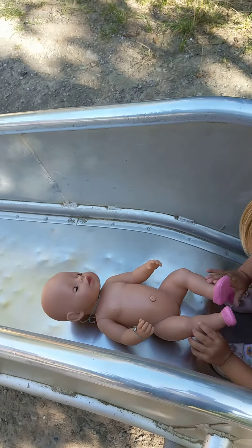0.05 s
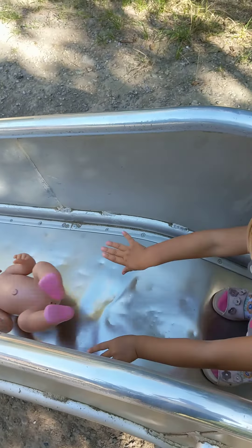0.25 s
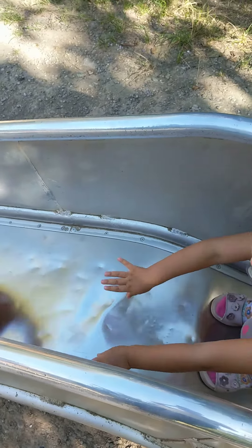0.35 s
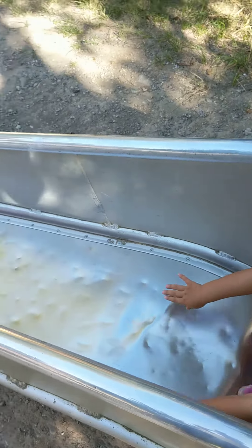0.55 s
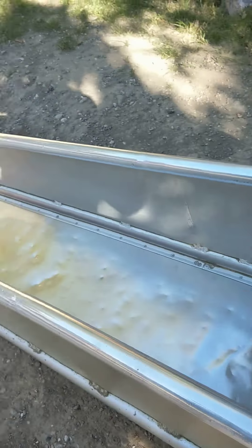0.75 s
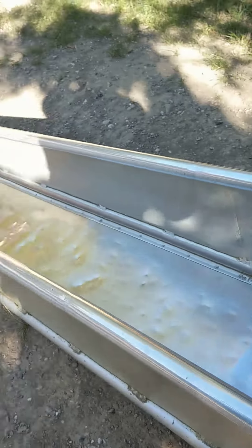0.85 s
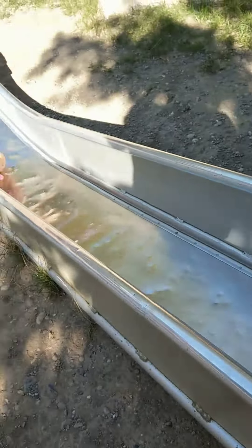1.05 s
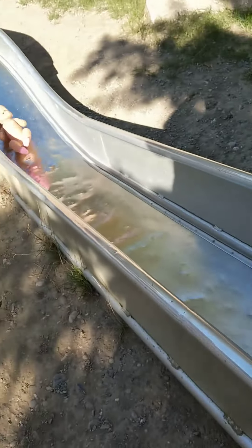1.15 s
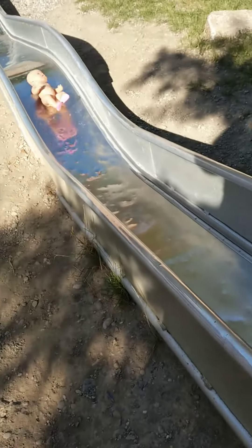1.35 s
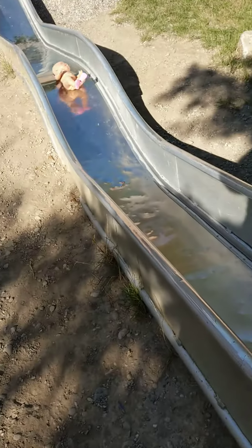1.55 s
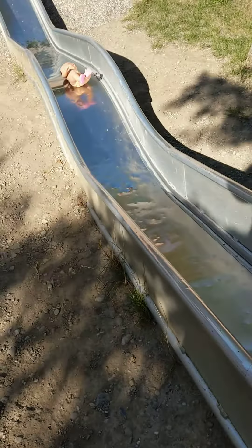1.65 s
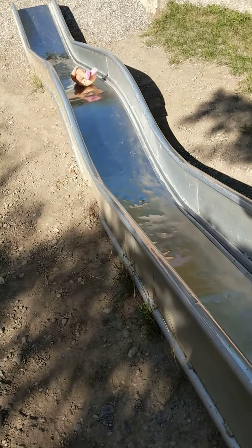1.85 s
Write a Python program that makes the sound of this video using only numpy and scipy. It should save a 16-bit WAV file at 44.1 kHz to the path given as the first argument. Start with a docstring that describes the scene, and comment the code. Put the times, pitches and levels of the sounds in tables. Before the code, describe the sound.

Plastic doll sliding down a steel slide outdoors, with hollow bumps, scraping and rattling.

```python
"""A hollow plastic doll goes down a steel playground slide: it scrapes and judders, knocks twice hard,
then rattles away. Each contact ticks, makes the doll's shell clack and sets the steel sheet booming;
between contacts the doll rubs along. Here and there the plastic sticks to the metal and squeaks,
and at full speed the loose limbs chatter. Open air with a little low wind lies behind."""
import sys
import numpy as np
from scipy.fft import rfft, irfft, next_fast_len
from scipy.io import wavfile
from scipy.ndimage import map_coordinates

SR = 44100
rng = np.random.default_rng(int(sys.argv[2]) if len(sys.argv) > 2 else 0)


def generate_wav(signal):
    """Clip the signal to [-1, 1] and save it as 16-bit WAV at the path in sys.argv[1]."""
    frames = np.transpose(np.atleast_2d(signal))
    scaled = np.clip(frames, -1, 1) * 32767
    pcm = np.round(scaled).astype(np.int16)
    wavfile.write(sys.argv[1], SR, pcm)


N = 83790

# Levels are relative: the dB settings below shift them. A ring time (T60) is the time to fade 60 dB.
# The doll hits the slide. Each row: start in seconds, tick level in dB, boom level in dB,
# boom pitch in Hz, then the clang, clack and snap levels in dB.
CONTACTS = [(0.009, -76, -40.5, 215, -46.5, -53, -63), (0.146, -45, -34.5, 210, -47.5, -43, -40),
            (0.1698, -50, -43, 225, -49.5, -38, -44), (0.207, -47, -46, 270, -60, -37, -59),
            (0.214, -60, -40, 252, -58, -33, -59.0), (0.228, -39.5, -34, 236, -38.5, -19, -49),
            (0.2432, -53, -33, 220, -38, -35, -44), (0.2632, -62, -22.5, 249, -36, -29, -34.5),
            (0.285, -37, -20.5, 266.0, -31.5, -28, -34.5), (0.3255, -27.5, -16, 246, -19.5, -27.5, -32),
            (0.339, -41, -27, 252.0, -41, -35, -34), (0.384, -72.0, -21, 226, -47, -64, -59),
            (0.3962, -49, -37, 217, -37.5, -44, -48), (0.4786, -29, -7.5, 272, -25, -15, -26),
            (0.4993, -39, -18, 283, -35.5, -33, -33.5), (0.511, -62, -12, 245, -26, -32.5, -52),
            (0.5354, -45, -18, 220, -34.5, -38, -42), (0.576, -47.5, -31, 250, -37, -43, -45.5),
            (0.6095, -48.5, -39, 232, -53, -41, -47), (0.6314, -58, -49, 242, -26.5, -31.5, -47),
            (0.647, -45.5, -16, 230, -34, -35.5, -45), (0.686, -48.5, -20, 229.7, -31, -43.5, -48),
            (0.7215, -41.5, -39, 234, -37, -38, -48), (0.745, -46, -21, 214, -74, -53, -53),
            (0.7678, -46, -50, 214.0, -52, -48.0, -43.5), (0.826, -39, -20.5, 237, -31.5, -30.5, -39.5),
            (0.836, -70, -16, 225, -46, -62, -70), (0.87, -47, -28, 247.0, -36.5, -39, -42.5),
            (0.8826, -50, -22, 247.0, -31.5, -35.5, -45), (0.894, -43, -27.5, 236, -31.5, -38, -53),
            (0.921, -38, -22, 221.6, -39.5, -38, -37), (0.949, -53, -24, 225, -48, -44.5, -44),
            (0.957, -51, -43, 198.0, -43, -40, -52), (0.9756, -44, -41, 196.0, -48, -48.5, -59),
            (1.023, -47, -35, 250, -45, -46, -45), (1.0369, -44.5, -30, 238, -31, -33.5, -45.0),
            (1.042, -56, -22, 238, -32, -45, -52), (1.0702, -48, -21, 259.0, -58, -50, -60),
            (1.0965, -43.5, -23, 280, -35.5, -32.5, -41.5), (1.1166, -43.5, -17.5, 277, -31.5, -42, -44),
            (1.129, -48.0, -27, 248, -31, -31.5, -40.5), (1.155, -47, -20.5, 205, -35, -50, -51),
            (1.1627, -66.0, -17.5, 220, -27, -34, -46), (1.185, -49, -23, 227.0, -31, -36, -49),
            (1.208, -42, -29, 222, -34.5, -34.5, -51), (1.214, -34, -16.5, 232, -33, -35, -49),
            (1.2312, -42.5, -21, 251.0, -39.5, -39, -43), (1.2491, -41, -13.5, 249.5, -25.5, -34, -40),
            (1.2829, -49, -40, 231, -53, -46, -48), (1.3006, -43, -20, 250.0, -24, -31, -46),
            (1.321, -40.5, -27, 215, -30.5, -33, -44), (1.347, -51, -25.5, 201, -36, -55, -46),
            (1.356, -49, -20.5, 242, -38, -42, -45), (1.3708, -42, -14.5, 265.0, -26, -34.5, -55),
            (1.3953, -47, -24, 256, -37, -39, -34.5), (1.465, -41.5, -21, 200, -37.5, -39, -41.5),
            (1.5216, -55, -34, 205.0, -57, -45, -49), (1.5527, -47, -31, 217.0, -37, -38, -44),
            (1.5828, -54, -21.5, 227.5, -40, -42, -57), (1.7421, -53, -47, 209, -69.5, -55, -53)]
# The tones a struck thing rings with. Each row: pitch in Hz, level in dB, ring time in seconds.
SHEET_TONES = [(137.6, -9.5, 0.27), (177, -19, 0.095), (205.7, -3, 0.26), (225.6, -7, 0.64),
               (241.7, -4, 0.4), (267.5, -11, 0.23), (288.9, 0, 0.17), (327, -3.5, 0.2), (394.5, -4, 0.26),
               (445.5, -6.5, 0.18), (571.8, -3, 0.24), (700.6, -8, 0.19), (758, -8.5, 0.23),
               (806.4, -14.5, 0.16), (935, -12.5, 0.19), (1089, -12.5, 0.19), (1134, -23, 0.095)]
SHELL_TONES = [(1490, -12, 0.074), (1727, -15, 0.032), (2050, -7.5, 0.036), (2244, 0.5, 0.048),
               (2395, -7, 0.029), (2640, -13, 0.028), (3440, -14, 0.028), (4120, -17, 0.035)]
# The shell rings higher as the doll rattles on its limbs. Each row: time in seconds, pitch multiplier.
SHELL_PITCH = [(1.13, 0.98), (1.21, 1.1), (1.33, 1.03), (1.4, 1.1), (1.53, 1.03)]
# The colour of each noise, from bass to treble. Each row: frequency in Hz, level in dB.
WIND_COLOUR = [(20, 6), (36, -1.5), (53, 1.5), (72, -8.5), (110, -4.5), (200, -20.5), (330, -19),
               (600, -21.5), (760, -21), (1050, -17), (1350, -22), (2200, -23.5), (3000, -37.5),
               (6500, -47), (8300, -46), (10000, -47.5), (15500, -49)]
RUMBLE_COLOUR = [(25, -8), (53, -10.5), (74, -5), (110, -7), (145, 2), (205, 4), (235, 3.5), (290, -9),
                 (400, -11.5), (600, -19.5), (1000, -41), (2000, -61.5)]
SCRAPE_COLOUR = [(300, -7), (900, 23), (1500, 15.5), (2300, 18), (3100, 8), (6500, 3.5), (8400, -2.5),
                 (10300, -1.5), (11900, -2), (13000, -33), (15500, -41)]
HISS_COLOUR = [(3000, -19), (6000, -4), (7300, -10), (8000, -6), (8900, -2.5), (10000, -24), (13000, -30)]
CLANG_COLOUR = [(30, -24), (60, -18), (130, -13.5), (300, 7.5), (480, -1), (600, 0), (760, -4.5), (950, -8),
                (1200, -10.5), (1450, -16.5), (2300, -21), (3000, -34), (6000, -50), (14000, -70)]
CLACK_COLOUR = [(300, -30), (900, -23), (1400, -2.5), (1900, 4), (2300, 2), (2650, -5.5), (2950, -25),
                (3800, -14), (5000, -25), (10000, -79)]
SNAP_COLOUR = [(500, -20), (1200, -12), (2300, 1), (3000, -3), (4000, -6), (5400, -3), (6500, -42),
               (8000, -70), (12000, -45), (15000, -82)]
TICK_COLOUR = [(1000, -72), (4000, -19), (6000, 3), (7000, -0.5), (8100, 6), (9200, 0), (10500, -8),
               (11900, -1.5), (13000, -39), (15500, -28)]
CHATTER_COLOUR = [(300, -2), (600, 12), (1100, -15), (1600, -26), (2300, -9), (3000, -28), (9000, -20),
                  (15000, -49)]
# How the sliding noises swell and fade. Each row: time in seconds, level in dB.
RUMBLE_LEVEL = [(0, -79), (.12, -69), (.22, -46), (.31, -34), (.36, -27), (.45, -30), (.53, -21.5),
                (.61, -33.5), (.7, -28.5), (.79, -38.5), (.91, -27.5), (1.0, -33), (1.17, -31), (1.38, -25),
                (1.52, -33), (1.62, -34), (1.72, -45), (1.9, -63)]
SCRAPE_LEVEL = [(0, -80), (.135, -56), (.155, -47.5), (.195, -57), (.215, -46), (.27, -43.5), (.315, -60),
                (.35, -51), (.46, -49.5), (.56, -53.5), (.72, -51), (.85, -58.5), (1.06, -57), (1.22, -55),
                (1.4, -54.5), (1.63, -63.5), (1.77, -77), (1.9, -84)]
HISS_LEVEL = [(.1, -88), (.2, -64.5), (.45, -62.5), (.8, -70), (1.6, -74.5), (1.76, -67.5), (1.9, -73)]
# The doll judders as it is pushed off. Each row: time in seconds, pitch in Hz, level in dB.
JUDDER_PATH = [(0.199, 280, -52), (0.213, 272.5, -33.5), (0.237, 258.2, -30.5), (0.256, 247.3, -50),
               (0.296, 263.8, -21.5), (0.317, 254, -20.5), (.342, 243.8, -16), (.385, 230.6, -20.5),
               (.41, 223, -53)]
# Plastic sticks to steel. Each row: start in seconds, length in seconds, pitch in Hz, level in dB.
SQUEAKS = [(0.498, .012, 11800, -52), (0.577, 0.006, 11700, -52), (0.606, 0.0081, 11400, -54),
           (1.154, 0.0071, 11670, -42), (1.17, 0.017, 11900, -53), (1.208, 0.013, 12000, -54),
           (1.211, 0.022, 9870, -46), (1.212, 0.012, 8700, -42), (1.538, 0.0087, 4980, -50)]
# How alike a noise starts out on the left and right. Each row: frequency in Hz, likeness from 0 to 1.
SLIDE_LIKENESS = [(30, 0.79), (80, 1), (160, .995), (300, .99), (600, 0.81), (2300, 0.81), (3500, 0.17),
                  (12000, 0.073)]
WIND_LIKENESS = [(30, 0.49), (300, 0.91), (1500, 0.7), (4000, 0.092)]
# Which side hears the slide louder. Each row: frequency in Hz, left minus right in dB.
BALANCE = [(60, 0.5), (200, 0.5), (700, 0.4), (1300, -1), (2300, 5.5), (3200, -2.5), (4400, -3), (8100, -7),
           (12000, -2.5)]
# How far the left wave runs ahead of the right. Each row: frequency in Hz, lead in radians.
LEFT_LEAD = [(20, 0), (2600, 0.16), (3300, -2.2), (5000, -2), (7500, -13), (8400, -11), (12300, -19),
             (15000, -10)]

WIND_DB, WIND_LEFT_DB = -44, 1.5  # the wind is stronger on the left
RUMBLE_DB, SCRAPE_DB, GRAIN_DB, GRAINS_PER_S = -1, 1, 3.5, 890
TONE_SCATTER_DB = 2.5  # each blow lands elsewhere, so the mix of tones varies
THUMP_DB, THUMP_T60_S = 0.5, 0.082
BOOM_DB, BOOM_RISE_S, BOOM_TOP_HZ = -13, 0.002, 360  # sheet tones above the top belong to the clang
BASS_CUT_HZ = 110  # the thin sheet gives off little sound below this
CLANG_DB, CLANG_CRACK_DB, CLANG_TONES_DB, CLANG_RISE_S, CLANG_T60_S = 1.5, 12, -5, 0.00058, 0.13
SHELL_DB, SHELL_RISE_S, SHELL_DETUNE = -5.5, 0.00028, 0.025  # detune: share the pitch may stray by
CLACK_DB, CLACK_CRACK_DB, CLACK_T60_S = -4, 11.5, 0.041
TICK_DB, SNAP_DB, CLICK_CRACK_DB = -1, -0.5, 6.5
CLICK_RISE_S, CLICK_T60_S, CLICK_TAIL_DB, CLICK_TAIL_T60_S = 0.00087, 0.02, -13, 0.053
JUDDER_DB, JUDDER_WAVER_HZ, JUDDER_WAVERS_PER_S = -1, 3.6, 46
SQUEAK_WAVER_HZ, SQUEAK_WAVERS_PER_S = 350, 1200
CHATTER_START_S, CHATTER_END_S = 1.1, 1.42
CHATTER_DB, CHATTER_SCATTER_DB, CHATTER_T60_S = -40, 2.5, 0.023
TOP_HZ = 15850
TIME = np.arange(N) / SR
RING_TIME = np.arange(SR // 2) / SR  # seconds since a blow
SIDES = np.array([[.5], [-.5]])  # shares a difference between left and right


def amp(db):
    """Turn decibels into a multiplier."""
    return 10 ** (np.asarray(db) / 20)


def unit(x):
    """Scale a signal to an average power of 1."""
    return x / np.sqrt(np.mean(x ** 2) + 1e-20)


def along(points, hz):
    """Read a table between its frequencies, with octaves evenly spaced."""
    frequencies, values = np.transpose(points)
    return np.interp(np.log(hz + 1), np.log(frequencies + 1), values)


def curve(rows):
    """Join a table's time points with straight lines, one value per sample."""
    return np.interp(TIME, *np.transpose(rows))


def filtered(x, response):
    """Multiply each frequency in x by response(hz)."""
    size = next_fast_len(N + SR // 4)
    return irfft(rfft(x, size) * response(np.fft.rfftfreq(size, 1 / SR)), size)[..., :N]


def noise(colour, likeness=SLIDE_LIKENESS):
    """Stereo noise, made of a part both sides share and a part that sets them apart."""
    def response(hz):
        spread = np.arccos(np.clip(along(likeness, hz), -1, 1)) / 2
        return amp(along(colour, hz)) * [np.cos(spread), np.sin(spread)]
    shared, apart = filtered(rng.standard_normal((2, N)), response)
    return unit(np.array([shared + apart, shared - apart]))


def wobble(rate):
    """A smooth curve through `rate` random values a second."""
    return map_coordinates(rng.standard_normal(N // 8), [TIME * rate], mode="mirror")


def fade(rise, t60):
    """The loudness of one blow: it rises quickly, then dies away."""
    return (1 - np.exp(-RING_TIME / rise)) * np.exp(-np.log(1000) * RING_TIME / t60)


def ping(hz, rise, t60):
    """One pure tone that dies away."""
    return np.sin(2 * np.pi * hz * RING_TIME) * fade(rise, t60)


def add(track, start, sound):
    """Mix a sound into the track at `start` seconds."""
    part = track[max(0, round(start * SR)):][:len(sound)]
    part += sound[:len(part)]


def struck(tones, times, levels_db, rise):
    """Ring a set of tones, in a new mix for every blow."""
    rings = np.array([amp(db) * ping(hz, rise, t60) for hz, db, t60 in tones])
    out = np.zeros(N)
    for start, db in zip(times, levels_db):
        mix = amp(db + TONE_SCATTER_DB * rng.standard_normal(len(tones)))
        add(out, start, mix @ rings)
    return out


def bursts(colour, times, levels_db, envelope):
    """Tones too crowded to tell apart: noise whose energy each blow tops up."""
    energy = np.zeros(N)
    for start, db in zip(times, levels_db):
        add(energy, start, (amp(db) * envelope) ** 2)
    return np.sqrt(energy) * noise(colour)


def cracks(colour, times, levels_db, size=2048):
    """The first instant of each hard contact: one sharp pulse of the given colour."""
    cepstrum = irfft(np.log(amp(along(colour, np.fft.rfftfreq(size, 1 / SR)))))
    # Keeping only the first half packs the pulse's energy at its start (minimum phase).
    first_half = (np.arange(size) > 0) & (np.arange(size) < size // 2)
    pulse = irfft(np.exp(rfft(2 * cepstrum * first_half)))
    pulse /= np.linalg.norm(pulse)
    out = np.zeros(N)
    for start, db in zip(times, levels_db):
        add(out, start + CLICK_RISE_S, amp(db) * pulse)
    return out


def wind():
    """Open air: a soft, steady, low rush."""
    return amp(WIND_DB + SIDES * WIND_LEFT_DB) * noise(WIND_COLOUR, WIND_LIKENESS)


def sliding():
    """Plastic rubs on steel: a grainy scrape and a thin hiss over the rumble of the shaken sheet."""
    rumble = amp(curve(RUMBLE_LEVEL) + RUMBLE_DB) * noise(RUMBLE_COLOUR)
    grain = amp(GRAIN_DB * wobble(GRAINS_PER_S))
    scrape = amp(curve(SCRAPE_LEVEL) + SCRAPE_DB) * unit(grain * noise(SCRAPE_COLOUR))
    hiss = amp(curve(HISS_LEVEL)) * unit(grain * noise(HISS_COLOUR))
    return rumble + scrape + hiss


def sheet_boom(times, pitches, levels_db):
    """The sheet dents and springs back with a thump under each blow, and its low tones ring on."""
    def bass_cut(hz):
        return -hz ** 2 / (BASS_CUT_HZ ** 2 - hz ** 2 + 1j * np.sqrt(2) * hz * BASS_CUT_HZ)
    thumps = np.zeros(N)
    for start, hz, db in zip(times, pitches, levels_db):
        add(thumps, start, amp(db + THUMP_DB) * ping(hz, BOOM_RISE_S, THUMP_T60_S))
    low_tones = [tone for tone in SHEET_TONES if tone[0] < BOOM_TOP_HZ]
    ring = struck(low_tones, times, levels_db + BOOM_DB, BOOM_RISE_S)
    return filtered(thumps + ring, bass_cut)


def sheet_clang(times, levels_db):
    """The struck steel gives a crack and a wash of noise, and its higher tones ring."""
    crack = cracks(CLANG_COLOUR, times, levels_db + CLANG_CRACK_DB)
    wash = bursts(CLANG_COLOUR, times, levels_db + CLANG_DB, fade(CLANG_RISE_S, CLANG_T60_S))
    high_tones = [tone for tone in SHEET_TONES if tone[0] >= BOOM_TOP_HZ]
    return crack + wash + struck(high_tones, times, levels_db + CLANG_TONES_DB, CLANG_RISE_S)


def shell_clack(times, levels_db):
    """Head, back and limbs strike in turn, so the hollow shell clacks a bit higher or lower each time."""
    ring = np.zeros(N)
    for start, blow_db in zip(times, levels_db):
        tuning = np.interp(start, *np.transpose(SHELL_PITCH)) + SHELL_DETUNE * rng.uniform(-1, 1)
        for hz, db, t60 in SHELL_TONES:
            gain = amp(blow_db + SHELL_DB + db + TONE_SCATTER_DB * rng.uniform(-1, 1))
            add(ring, start, gain * ping(hz * tuning, SHELL_RISE_S, t60)[:SR // 10])
    crack = cracks(CLACK_COLOUR, times, levels_db + CLACK_CRACK_DB)
    wash = bursts(CLACK_COLOUR, times, levels_db + CLACK_DB, fade(SHELL_RISE_S, CLACK_T60_S))
    return crack + wash + ring


def clicks(colour, times, levels_db):
    """A hard touch: a crack, a short spray of noise and a faint answer from the side walls."""
    crack = cracks(colour, times, levels_db + CLICK_CRACK_DB)
    spray = fade(CLICK_RISE_S, CLICK_T60_S)
    tail = amp(CLICK_TAIL_DB) * fade(CLICK_RISE_S, CLICK_TAIL_T60_S)
    return crack + bursts(colour, times, levels_db, spray + tail)


def knocks():
    """Each contact rings the sheet and the shell, and snaps and ticks where they touch."""
    times, tick_db, boom_db, boom_hz, clang_db, clack_db, snap_db = np.transpose(CONTACTS)
    sheet = sheet_boom(times, boom_hz, boom_db) + sheet_clang(times, clang_db)
    shell = shell_clack(times, clack_db)
    snaps = clicks(SNAP_COLOUR, times, snap_db + SNAP_DB)
    ticks = clicks(TICK_COLOUR, times, tick_db + TICK_DB)
    return sheet + shell + snaps + ticks


def judder():
    """Plastic sticks and slips in step with the sheet: a clean hum that sags in pitch."""
    times, hz, db = np.transpose(JUDDER_PATH)
    pitch = np.interp(TIME, times, hz) + JUDDER_WAVER_HZ * wobble(JUDDER_WAVERS_PER_S)
    level = np.interp(TIME, times, amp(db + JUDDER_DB), left=0, right=0)
    return level * np.sin(2 * np.pi * np.cumsum(pitch) / SR)


def squeaks():
    """A thin, high, unsteady whistle wherever the plastic sticks for a moment."""
    waver = SQUEAK_WAVER_HZ * wobble(SQUEAK_WAVERS_PER_S)
    out = np.zeros(N)
    for start, length, hz, db in SQUEAKS:
        pitch = hz + waver[round(start * SR):][:round(length * SR)]
        whistle = np.sin(2 * np.pi * np.cumsum(pitch) / SR)
        add(out, start, amp(db) * np.hanning(len(pitch)) * whistle)
    return out


def limb_chatter(count=30):
    """The loose limbs patter lightly and unevenly, one tap somewhere in each short time slot."""
    slots = np.linspace(CHATTER_START_S, CHATTER_END_S, count + 1)
    times = rng.uniform(slots[:-1], slots[1:])
    levels_db = CHATTER_DB + CHATTER_SCATTER_DB * rng.standard_normal(count)
    return bursts(CHATTER_COLOUR, times, levels_db, fade(SHELL_RISE_S, CHATTER_T60_S))


def scene():
    """The doll on the slide, heard a little differently on the left and right, with wind behind."""
    def placement(hz):
        return amp(SIDES * along(BALANCE, hz)) * np.exp(1j * SIDES * along(LEFT_LEAD, hz))
    slide = knocks() + limb_chatter() + judder() + sliding() + squeaks()
    return filtered(slide, placement) + wind()


def record(dry):
    """Cut away the very highest treble."""
    return filtered(dry, lambda hz: hz < TOP_HZ)


dry = scene()
out = record(dry)
generate_wav(out)
```